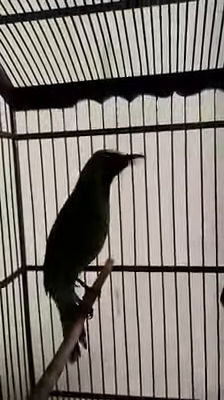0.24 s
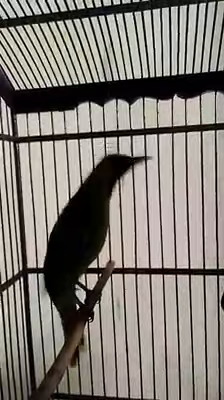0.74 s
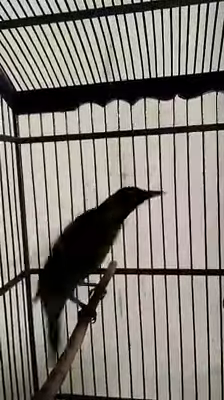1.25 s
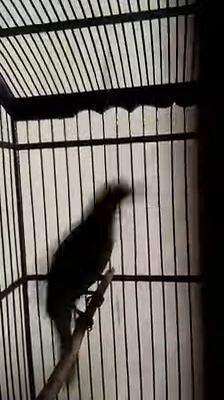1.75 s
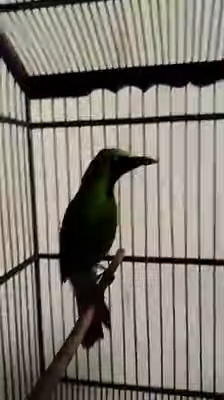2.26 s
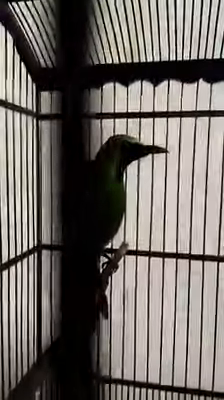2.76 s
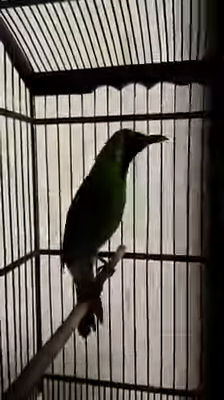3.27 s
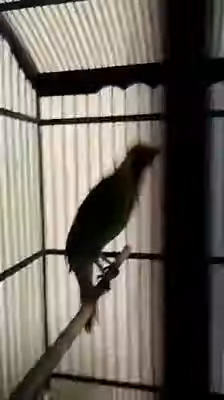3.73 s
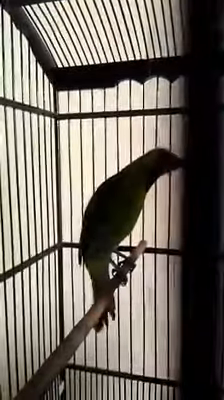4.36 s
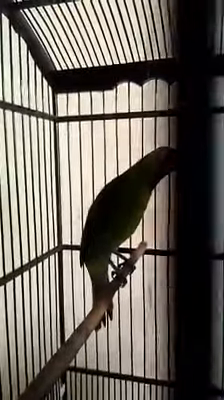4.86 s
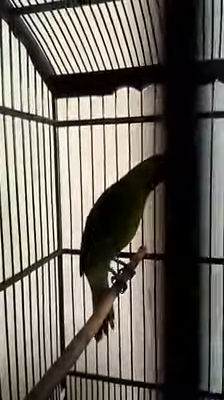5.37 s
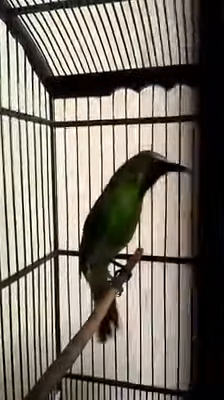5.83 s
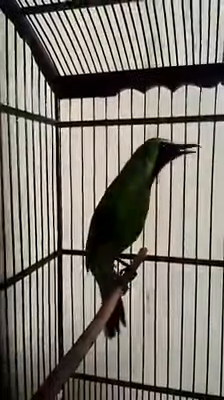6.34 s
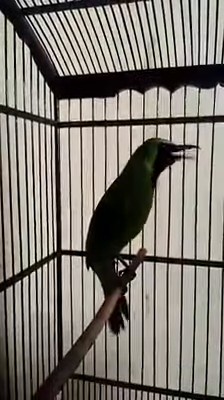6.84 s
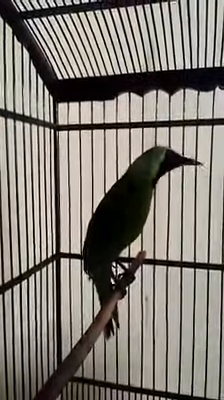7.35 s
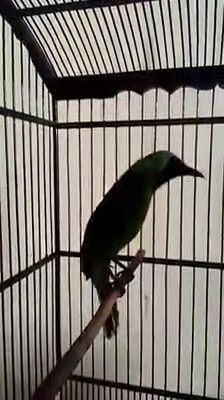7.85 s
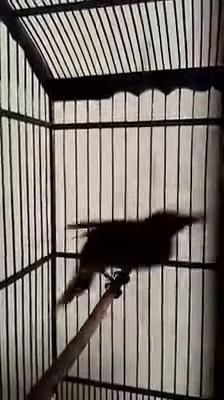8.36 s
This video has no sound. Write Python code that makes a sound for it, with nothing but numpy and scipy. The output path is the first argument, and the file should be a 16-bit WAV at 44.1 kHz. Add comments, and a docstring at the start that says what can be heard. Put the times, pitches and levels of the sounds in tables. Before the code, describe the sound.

A caged songbird sings piercing whistled glides, raspy chirps and a rapid chip run in a small echoing room, with sharp clicks and faint hiss.

```python
"""A leafbird sings in a wire cage in a small hard-walled room, over faint air and hiss.
From the start clear gliding tones alternate with raspy notes; a glassy sheen and a rush of noise go with each.
Quick chips, a thin high tone and sharp clicks join in, later arching hoots and two faint far-off tones.
At the end the bird hops round under a sharper high hiss. Notes are gliding tones, noises are filtered
chance; room echoes surround the bird, and the loudest sounds overload the microphones."""
import sys
import numpy as np
from scipy import signal
from scipy.fft import rfft, irfft
from scipy.io import wavfile
from scipy.ndimage import uniform_filter1d

SR = 44100
rng = np.random.default_rng(int(sys.argv[2]) if len(sys.argv) > 2 else 0)


def log_audio(samples):
    """Write samples as a 16-bit WAV file to the path given in sys.argv[1]."""
    # one column per channel
    frames = np.atleast_2d(samples).T
    # limit to full scale, then quantise
    limited = np.clip(frames, -1, 1)
    pcm = np.round(limited * 32767).astype(np.int16)
    wavfile.write(sys.argv[1], SR, pcm)


N = 379260
TIME = np.arange(N) / SR  # s

# In all tables levels are relative, ahead of the mix gains.
# scatter/Hz: pitch swings by at most 1.25 times this. sheen/dB: each sheen line re its note.


def gain_of(db):
    """Decibels to amplitude."""
    return 10 ** (np.asarray(db) / 20)


def evened(x):
    """Scales to rms 1."""
    return x / np.sqrt(np.mean(abs(x) ** 2) + 1e-20)


def read(points, hz):
    """Reads a spectrum table on a log-frequency axis."""
    f, value = np.transpose(points)
    return np.interp(np.log(hz + 1), np.log(f + 1), value)


def filtered(x, spectrum):
    """Gives a sound a spectrum, with no phase shift."""
    size = x.shape[-1]
    hz = np.fft.rfftfreq(size, 1 / SR)
    return irfft(rfft(x) * gain_of(read(spectrum, hz)), size)


def coloured(spectrum, size):
    """Noise of rms 1 with a given spectrum."""
    return evened(filtered(rng.standard_normal(size), spectrum))


def wander(top_hz, size):
    """Smooth chance up to a rate, rms 1 over half a second."""
    span = SR // 2
    hz = np.fft.rfftfreq(span, 1 / SR)
    smooth = irfft(rfft(rng.standard_normal(span)) / (1 + (hz / top_hz) ** 4))
    return evened(smooth)[:size]


def fader(curve):
    """A level curve as a gain, -120 dB outside its span."""
    s, db = np.transpose(curve)
    return gain_of(np.interp(TIME, s, db, left=-120, right=-120))


def swells(rows, slope_db_per_s):
    """A gain that rises to each held level and falls away again at one rate."""
    total = np.zeros(N)
    for s, length_s, db in rows:
        outside_s = np.maximum(abs(TIME - s - length_s / 2) - length_s / 2, 0)
        total += gain_of(db - slope_db_per_s * outside_s)
    return total


def add(mix, s, sound):
    """Mixes a sound in at a time."""
    part = mix[..., max(round(s * SR), 0):][..., :sound.shape[-1]]
    part += sound[..., :part.shape[-1]]


def placed(x, left_db):
    """Leans a sound left: left_db is the level difference between the microphones."""
    return x * gain_of(np.array([[left_db], [-left_db]]) / 2)


def patchy(x, depth_db, span_s, span_hz):
    """Makes a sound flicker in small random patches of time and pitch, alike in both channels."""
    hz, t, z = signal.stft(x, SR, nperseg=1024, noverlap=768)
    field = rng.standard_normal(z.shape[-2:])
    for axis, span in enumerate([span_hz / hz[1], span_s / t[1]]):
        rate = np.fft.rfftfreq(field.shape[axis])
        smooth = np.expand_dims(np.exp(-(2 * rate * span) ** 2), axis=1 - axis)
        field = irfft(rfft(field, axis=axis) * smooth, field.shape[axis], axis=axis)
    patches = evened(gain_of(depth_db * np.tanh(evened(field))))
    return signal.istft(z * patches, SR, nperseg=1024, noverlap=768)[1][..., :N]


def wash(spectrum, gain, flicker_db, shared):
    """Flickering noise on a level curve; shared is the power common to both microphones."""
    common = coloured(spectrum, N)
    separate = np.array([coloured(spectrum, N), coloured(spectrum, N)])
    pair = np.sqrt(shared) * common + np.sqrt(1 - shared) * separate
    smooth = uniform_filter1d(uniform_filter1d(rng.standard_normal(N), size=700), size=300)
    return pair * gain * gain_of(flicker_db * evened(smooth))


def room(x, wet_db, early_db):
    """Direct sound, a few echoes off the near walls, and a dense tail, different at each microphone."""
    # decay of the tail: f/Hz, t60/s
    decay = [(300, 0.58), (1700, 0.42), (3500, 0.34), (7000, 0.41), (14000, 0.31)]
    taps = rng.choice([-1., 1.], (2, SR)) * (rng.random((2, SR)) < 4000 / SR)
    hz, t, z = signal.stft(taps, SR, nperseg=256)
    build_up = 1 - np.exp(-t / 0.0063)
    fall = gain_of(-60 * t / read(decay, hz)[:, None])
    tail = signal.istft(z * build_up * fall, SR, nperseg=256)[1]
    response = gain_of(wet_db) * tail / np.linalg.norm(tail[0])
    at = (SR * rng.uniform(.002, .018, size=(2, 8))).astype(int)
    echoes = np.zeros_like(response)
    np.put_along_axis(echoes, at, rng.choice([-1., 1.], at.shape) / np.sqrt(at.shape[1]), 1)
    response = response + gain_of(early_db) * echoes
    return x + signal.fftconvolve(x[None], response, axes=1)[:, :N]


def progress(length_s):
    """Runs from 0 to 1 through a note."""
    return np.linspace(0, 1, int(length_s * SR))


def syllable(glide_hz, level_db, scatter_hz, sheen_db, flutter_hz, flutter_db, attack_share, release_s, blur_hz):
    """Gliding tone, its sheen and its strength; chance scatters pitch and loudness, as unsteady membranes do."""
    overtone_db, sheen_step_hz = -38, 3750
    size = len(glide_hz)
    t, length_s = np.arange(size) / SR, size / SR
    hz = glide_hz + 1.25 * scatter_hz * np.tanh(wander(flutter_hz, size))  # membranes swing only so far
    ramp = np.minimum(t / length_s / attack_share, (length_s - t) / release_s)
    blow = gain_of(level_db) * np.sin(np.pi / 2 * np.clip(ramp, 0, 1)) ** 2
    blow *= np.sqrt(2) * evened(gain_of(flutter_db * wander(flutter_hz, size)))
    phase = 2 * np.pi * np.cumsum(hz) / SR
    note = np.cos(phase) + gain_of(overtone_db) * (np.cos(2 * phase) + .5 * np.cos(3 * phase))
    sheen = np.zeros(size)
    for k in range(1, 4):  # fuzzy lines that glide in parallel, at even steps above the note
        shift_hz = k * sheen_step_hz + blur_hz * wander(400, size)
        sheen += np.cos(phase + 2 * np.pi * np.cumsum(shift_hz) / SR)
    strength = np.full(size, gain_of(sheen_db / 2))
    return blow * np.array([note, gain_of(sheen_db) * sheen, strength])


def clear_tone(glide_hz, level_db, scatter_hz, sheen_db):
    """A clear syllable: slight, slower flutter."""
    return syllable(glide_hz, level_db, scatter_hz, sheen_db, flutter_hz=182, flutter_db=0.5,
                    attack_share=.2, release_s=0.0052, blur_hz=44.8)


def rasp(glide_hz, level_db, scatter_hz, sheen_db, attack_share):
    """A rough syllable: deeper, faster flutter."""
    return syllable(glide_hz, level_db, scatter_hz, sheen_db, flutter_hz=307, flutter_db=1.5,
                    attack_share=attack_share, release_s=.004, blur_hz=50.3)


def slides():
    """Clear tones that settle exponentially onto a held pitch, with thin, nearly steady high tones among them."""
    # t/s, length/s, from f/Hz, onto f/Hz, level/dB, scatter/Hz, sheen/dB
    rows = [(0, 0.034, 3092, 3346, -4.5, 10, -21.5), (0.037, 0.055, 2589, 2186, -6.5, 27, -13.5),
            (.09, .14, 2330, 2172, -21, 20, 2), (0.104, .014, 2360, 2212, -7, 57, -25),
            (0.233, .066, 4064, 3558, -14, 33, -5.5), (0.377, .088, 2239, 2338, -6.5, 30, -23),
            (2.212, .11, 2175, 2231, -28, 23, -33), (2.356, .055, 4000, 3515, -17, 86, -4.5),
            (3.691, 0.032, 1730, 2077, -12.5, 34, -7), (3.826, 0.091, 3495, 3295, -9, 29, -15.5),
            (3.91, .1, 2640, 2169, -6, 14, -11), (5.394, 0.17, 2577, 2350, -29, 130, -6),
            (5.411, .09, 4640, 4714, -24, 16, -1), (6.258, 0.089, 2052, 2000, -11.5, 120, -6),
            (6.326, .04, 1900, 2475, -6, 90, -19), (6.358, 0.16, 4720, 4737, -30, 12, 3),
            (6.437, .082, 3470, 3161, -7, 21, -21.5), (6.517, 0.055, 2260, 2524, -6, 48, -18),
            (6.713, .062, 4190, 3707, -2, 73, -15.5), (6.885, .053, 2340, 2740, -7, 89, -15.5),
            (7.133, .031, 2886, 2957, -6.5, 21, -18)]
    settle_share, rise_db = .3, 2.5  # rise: start to end
    mix = np.zeros((3, N))
    for s, length_s, from_hz, onto_hz, db, scatter_hz, sheen_db in rows:
        u = progress(length_s)
        glide_hz = onto_hz + (from_hz - onto_hz) * np.exp(-u / settle_share)
        add(mix, s, clear_tone(glide_hz, db + rise_db * (u - .5), scatter_hz, sheen_db))
    return mix


def sheen_colour(lines):
    """Strengthens the sheen lines in some bands and weakens them in others."""
    # f/Hz, gain/dB
    bands = [(4200, -31), (5500, -27), (6400, -10), (7200, -3), (8000, -11), (8600, -22.5), (9500, -10),
             (10300, 5), (11300, -3.5), (12200, -21.5), (13300, -20.5), (14300, -10), (15200, -36.5)]
    return filtered(lines, bands)


def rush(strength):
    """A faint rush of noise that follows the strength of every note."""
    # f/Hz, relative density/dB per Hz
    spectrum = [(1000, -32.5), (2200, -0.5), (3300, 3), (4200, -13), (5200, 12), (6100, 3.5), (7300, 9),
                (8700, 1), (10000, -9.5), (11300, 5), (12300, -2.5), (13600, -13.5), (15500, -9.5)]
    return strength * coloured(spectrum, N)


def air():
    """Room air: low noise that rises, drops back in part soon after two seconds, then stays nearly level."""
    # f/Hz, relative density/dB per Hz
    spectrum = [(18, -44), (30, -22.5), (107, 3.5), (199, -45), (229, -26), (327, -16.5), (595, -5),
                (998, -4), (1350, -1.5), (1680, -7), (2980, -8.5), (3500, -15), (4550, -45), (7700, -120)]
    # t/s, level/dB
    curve = [(0, -62), (1.1, -49.5), (2.1, -50.5), (2.6, -56.5), (5.3, -57), (8.6, -55)]
    return placed(wash(spectrum, fader(curve), flicker_db=-1.4, shared=0.057), left_db=6.0) * gain_of(1.0)


def hiss():
    """Soft wide noise that swells above its resting level."""
    # f/Hz, relative density/dB per Hz
    spectrum = [(1470, -67), (2500, -50.5), (2980, -31.5), (3310, -13.5), (5040, -5), (5690, -4), (8650, 2),
                (9550, -1.5), (12700, -1), (15400, -28)]
    # t/s, length/s, level/dB
    rows = [(.8, 2.19, -51), (1.48, 0.27, -42.5), (6.5, 0.22, -36.5), (8.25, 0.28, -40.5)]
    rest_db, slope_db_per_s = -59, 60
    gain = gain_of(rest_db) + swells(rows, slope_db_per_s)
    return placed(wash(spectrum, gain, flicker_db=1.5, shared=0.17), left_db=8) * gain_of(2.5)


def rasps():
    """Harsh notes swell from a soft lead-in and climb, the harsher the farther."""
    # t/s, length/s, f/Hz, level/dB, scatter/Hz, sheen/dB
    rows = [(0.098, 0.18, 4302, -27, 199.4, 5.5), (0.884, .04, 3183, -26, 274.5, -9.5),
            (1.097, 0.048, 4730, -35, 594, 10), (2.017, .06, 4200, -20.5, 520, -10.5),
            (2.107, .022, 4427, -6.5, 583, -1), (2.132, .044, 5516, -9.5, 513, -8),
            (2.149, 0.04, 3105, -18.5, 226, 1.5), (2.181, 0.07, 5350, -30.5, 770, 7.5),
            (2.297, 0.057, 3673, -26.5, 698, -1), (2.343, .05, 4267, -19.5, 710.5, 4),
            (2.41, .1, 3640, -28, 149.5, -28.5), (2.489, 0.13, 3818, -27, 432, -9),
            (2.748, 0.035, 2906, -26.5, 159.6, -14.5), (2.79, .09, 3397, -32.5, 282.3, -4.5),
            (3.157, .18, 3975, -25, 647, -4.5), (3.47, .15, 3923, -24.5, 560, -4.5),
            (3.91, 0.1, 4257, -29, 211.5, -9.5), (3.989, 0.095, 3343, -20, 146.4, -13),
            (5.526, 0.14, 3546, -19, 481.5, -7), (5.663, 0.063, 3866, -28.5, 477, -7),
            (5.884, 0.049, 2440, -25, 246.4, -20.5), (6.29, .06, 4246, -28, 247, -0.5),
            (6.774, 0.099, 3600, -15.5, 200.6, -13.5), (7.068, 0.041, 4380, -17.5, 59.1, 2.5),
            (7.183, 0.062, 7050, -11.5, 449, -13.5), (7.189, 0.12, 3163, -23.5, 399, -4),
            (7.231, .08, 4774, -24.5, 363, 3.5)]
    lead_in_s, climb_per_scatter, change_db = .008, 0.55, -1.5
    mix = np.zeros((3, N))
    for s, length_s, hz, db, scatter_hz, sheen_db in rows:
        from_middle = progress(length_s + lead_in_s) - .5
        glide_hz = hz + climb_per_scatter * scatter_hz * from_middle
        note = rasp(glide_hz, db + change_db * from_middle, scatter_hz, sheen_db, attack_share=.33)
        add(mix, s - lead_in_s, note)
    return mix


def rough_colour(notes):
    """Resonances in some bands colour the rough notes."""
    # f/Hz, gain/dB
    resonances = [(2200, -10.5), (2650, -7.5), (2950, -4), (3200, 3.5), (3550, -0.5), (3800, -2),
                  (4200, 3.5), (4600, -4.5), (5200, 4), (6000, 4), (7000, -7.5), (9000, -7.5)]
    return filtered(notes, resonances)


def swoops():
    """Whistles that sweep through, bowed above or below a straight glide, and swell."""
    # t/s, length/s, from f/Hz, to f/Hz, bow/Hz, level/dB, scatter/Hz, sheen/dB
    rows = [(.3, .081, 3580, 3080, -15.5, -7.5, 19, -21.5), (3.616, 0.043, 1926, 1243, 160, -17.5, 15, -1),
            (6.669, .049, 3463, 4124, 62, -9, 71, -7), (6.844, .049, 3527, 3098, 12, -8.5, 81, -15),
            (7.085, .063, 3445, 3178, 222, -11, 19, -4.5), (7.704, .1, 1653, 2139, -330, -12, 13, -2.5),
            (7.877, .112, 1899, 1827, -170, -15, 20, -2.5)]
    swell_db = 6.5  # start to end
    mix = np.zeros((3, N))
    for s, length_s, from_hz, to_hz, bow_hz, db, scatter_hz, sheen_db in rows:
        u = progress(length_s)
        glide_hz = from_hz + (to_hz - from_hz) * u + bow_hz * (1 - (2 * u - 1) ** 2)
        add(mix, s, clear_tone(glide_hz, db + swell_db * (u - .5), scatter_hz, sheen_db))
    return mix


def chips():
    """Quick rough chirps flick up, then fall ever faster onto one pitch."""
    # t/s, length/s, top f/Hz, level/dB, sheen/dB
    rows = [(.862, .055, 3950, -30, 1), (1.126, 0.043, 3940, -25, -4), (4.2, 0.044, 4890, -22, -4.5),
            (4.288, 0.052, 4730, -24, -9), (4.399, .056, 4430, -28.5, -7.5),
            (4.501, .053, 4485, -24.5, -6.5), (4.603, .055, 4244, -25, -8.5),
            (4.706, 0.034, 4390, -25.5, -12), (4.817, 0.039, 3756, -26.5, -9),
            (4.926, .032, 4260, -26.5, -2.5), (5.048, .035, 4050, -32, -5), (5.161, .042, 3906, -28.5, -1)]
    end_hz, change_db, scatter_per_fall, top_share = 3328, -2.5, .28, .25
    mix = np.zeros((3, N))
    for s, length_s, top_hz, db, sheen_db in rows:
        u, fall_hz = progress(length_s), top_hz - end_hz
        glide_hz = top_hz - fall_hz * ((u - top_share) / (1 - top_share)) ** 2
        level_db = db + change_db * (u - .5)
        add(mix, s, rasp(glide_hz, level_db, scatter_per_fall * fall_hz, sheen_db, attack_share=0.16))
    return mix


def thin_tone():
    """A thin high sine that holds faintly and flares twice."""
    # t/s, length/s, level/dB
    rows = [(1.14, 1.1, -51.5), (2.13, 0.05, -8.5), (2.365, 0.013, -15.5)]
    tone = swells(rows, slope_db_per_s=335) * np.sin(2 * np.pi * 12188 * TIME)
    return placed(tone, left_db=13) * gain_of(-4.0)


def clicks():
    """Beak and claws: bright noise bursts with a sharp onset and exponential decay."""
    # t/s, level/dB, t60/s
    rows = [(1.8724, -8, 0.048), (2.8887, -15, 0.041), (3.054, -12, 0.026), (4.901, -22, 0.05),
            (5.3965, -18.5, 0.29), (5.716, -7, 0.028), (5.8535, -3.5, 0.032), (6.0086, -5.5, 0.04),
            (7.9833, -11, 0.052), (8.432, -9.5, 0.098)]
    # f/Hz, relative density/dB per Hz
    spectrum = [(180, -68), (300, -41.5), (768, -38.5), (983, -39), (1960, -23.5), (2390, -44.5),
                (2560, -28), (3610, -28), (4480, -20.5), (7220, -10.5), (15400, -30)]
    mix, t = np.zeros(N), np.arange(SR // 8) / SR
    for s, db, t60_s in rows:
        envelope = gain_of(db - 60 * t / t60_s) * (1 - np.exp(-t / 0.00062))
        add(mix, s, coloured(spectrum, len(t)) * envelope)
    return gain_of(-13.0) * mix


def hoots():
    """Low whistles arch up and down, soft at first and softer at the ends."""
    # t/s, length/s, top f/Hz, level/dB, scatter/Hz, sheen/dB
    rows = [(3.055, 0.13, 1777, -12.5, 52, -8), (3.408, 0.11, 1750, -11.5, 18, -7),
            (5.534, 0.12, 1760, -12.5, 42, -1.5), (5.805, .104, 1757, -10.5, 16, -9),
            (6.044, 0.096, 1767, -10.5, 29, -5.5)]
    drop_share, ends_db = .3, -8.5  # at the ends, re the top
    start_db, gather_share = -4.5, 0.28
    mix = np.zeros((3, N))
    for s, length_s, top_hz, db, scatter_hz, sheen_db in rows:
        u = progress(length_s)
        off_top = (2 * u - 1) ** 2
        level_db = db + ends_db * off_top + start_db * np.exp(-u / gather_share)
        add(mix, s, clear_tone(top_hz * (1 - drop_share * off_top), level_db, scatter_hz, sheen_db))
    return mix


def far_tones():
    """Two long faint sines whose pitch wavers a little."""
    # t/s, length/s, f/Hz, level/dB
    rows = [(4.044, 2, 664, -67.5), (6.459, 1.1, 1068, -51)]
    mix = np.zeros(N)
    for s, length_s, hz, db in rows:
        size = int(length_s * SR)
        drift = coloured([(1, -1.5), (8, -6.0), (40, -60.0), (200, -120)], size)
        tone = np.sin(2 * np.pi * np.cumsum(hz + 7 * drift) / SR)
        add(mix, s, gain_of(db) * signal.windows.tukey(size, .3) * tone)
    return mix


def sizzle():
    """A sharper hiss: noise with a short swell, then a long even fade in dB."""
    # f/Hz, relative density/dB per Hz
    spectrum = [(1500, -39.5), (3600, -37.5), (4400, -19.5), (5600, -15), (6400, -7.5), (7300, 1.5),
                (8200, -12.5), (9000, -20), (11500, -17.5), (12300, -32), (13300, -24.5), (14300, -37.5)]
    start_s, attack_s, level_db, fade_db_per_s = 7.67, 0.22, -17, 18.5
    t = TIME - start_s
    fade = gain_of(level_db - fade_db_per_s * np.maximum(t - attack_s, 0))
    gain = np.clip(t / attack_s, 0, 1) * fade
    return placed(wash(spectrum, gain, flicker_db=1.0, shared=0.52), left_db=8.0) * gain_of(0.5)


def wings():
    """Wings and feathers as the bird hops round: low noise on a level curve."""
    # f/Hz, relative density/dB per Hz
    spectrum = [(150, -29.5), (300, -3.5), (420, -3.5), (600, -11.5), (800, -8), (1200, -22), (3000, -17)]
    # t/s, level/dB
    curve = [(8.079, -70), (8.17, -44), (8.3, -48.5), (8.45, -35.5), (8.6, -76)]
    return placed(wash(spectrum, fader(curve), flicker_db=3.0, shared=0.19), left_db=8.5)


def scene():
    """The bird in its room, over air and hiss."""
    clear = slides() + swoops() + hoots()  # rows: note, sheen, strength
    rough = rasps() + chips()
    bird = placed(room(clear[0], wet_db=-3.5, early_db=-5), left_db=2.5) * gain_of(0.5)
    raspy = patchy(room(rough_colour(rough[0]), wet_db=0.0, early_db=-2.5), depth_db=9.0, span_s=0.079, span_hz=148.6)
    bird += placed(raspy, left_db=2) * gain_of(-1.5)
    strength = gain_of(-22) * clear[2] + gain_of(-18.5) * rough[2]
    shimmer = room(sheen_colour(clear[1] + rough[1]), wet_db=0.0, early_db=-2.5)
    shimmer += room(rush(strength), wet_db=-1.5, early_db=-9) * gain_of(-0.5)
    bird += placed(patchy(shimmer, depth_db=11.0, span_s=0.035, span_hz=215.2), left_db=10.0)
    bird += placed(room(clicks(), wet_db=-7.0, early_db=-1), left_db=7)
    background = air() + hiss() + thin_tone() + sizzle() + wings()
    return bird + patchy(background, depth_db=7.5, span_s=.07, span_hz=179) + far_tones()


def record(dry):
    """Overloaded microphones clip, crackle and thump; then a low-pass limits the band."""
    # crackle: f/Hz, relative density/dB per Hz
    crackle_spectrum = [(30, 4), (110, 2), (300, 1), (1200, 2), (3000, 3.5), (5000, -1), (8500, 2),
                        (11000, 3.5), (12500, -8), (15500, -3.5)]
    driven = dry * gain_of(0.39)
    over = np.maximum(abs(driven) - .7, 0)
    excess = np.sqrt(abs(uniform_filter1d(over ** 2, size=200)))  # abs guards against rounding below 0
    noise = np.array([coloured(crackle_spectrum, N) for _ in dry])
    crackle = patchy(noise, depth_db=8.5, span_s=0.045, span_hz=265)
    thump_band = signal.butter(2, [15, 60], "bandpass", fs=SR, output="sos")
    thump = gain_of(-20.5) * signal.sosfilt(thump_band, excess)
    clipped = np.clip(driven, -.95, .95) + thump + gain_of(-22.5) * np.tanh(excess / 0.061) * crackle
    low_pass = signal.firwin(501, 15400, window=("kaiser", 8), fs=SR)
    return signal.oaconvolve(clipped, low_pass[None], "same")


dry = scene()
out = record(dry)
log_audio(out)
```